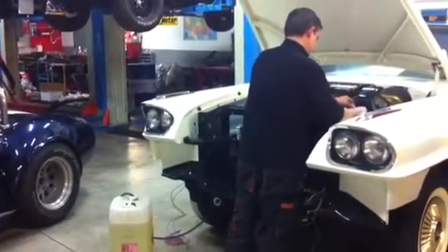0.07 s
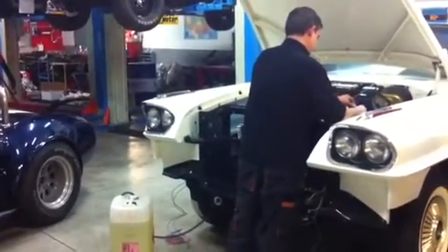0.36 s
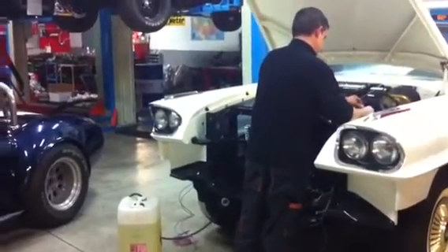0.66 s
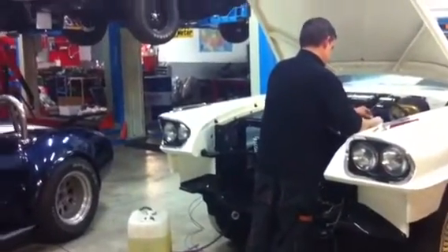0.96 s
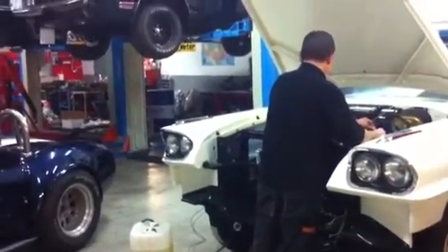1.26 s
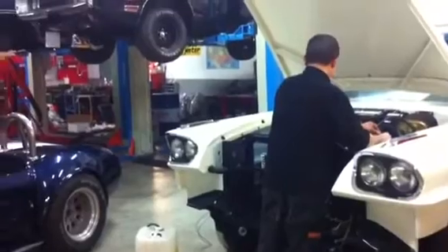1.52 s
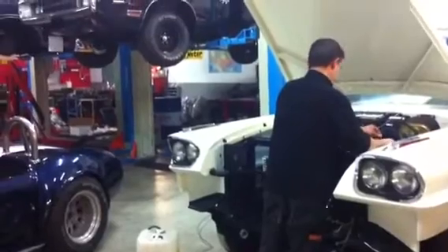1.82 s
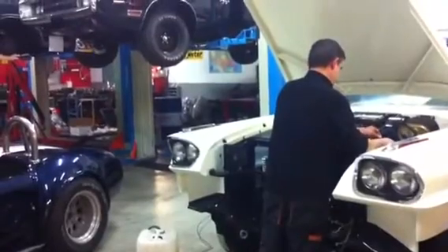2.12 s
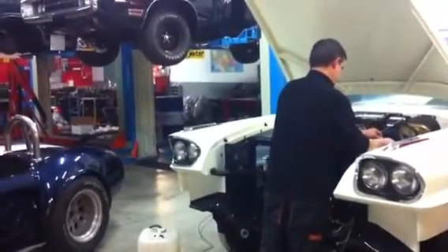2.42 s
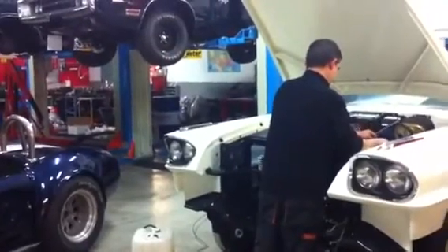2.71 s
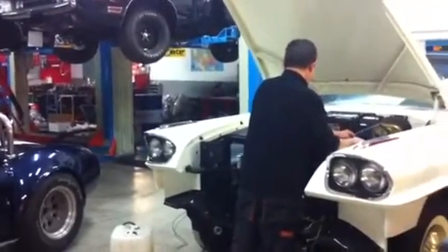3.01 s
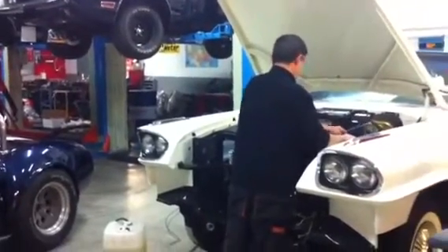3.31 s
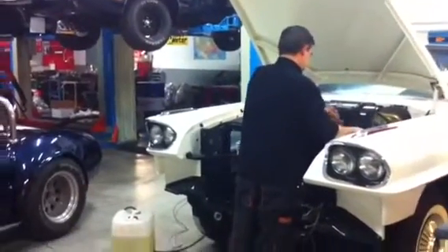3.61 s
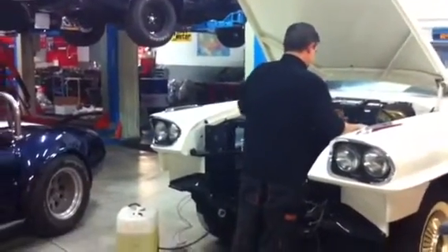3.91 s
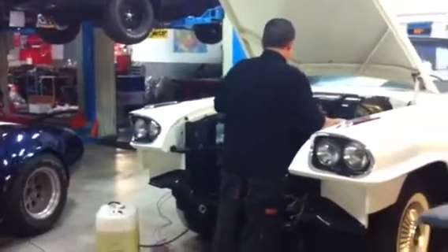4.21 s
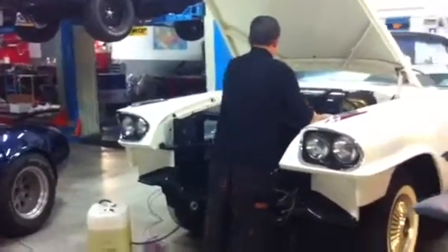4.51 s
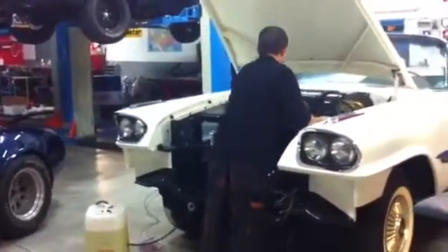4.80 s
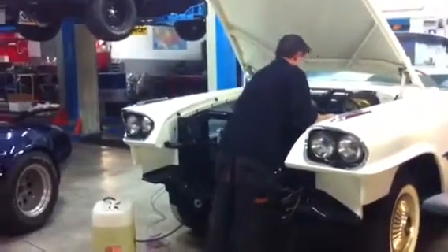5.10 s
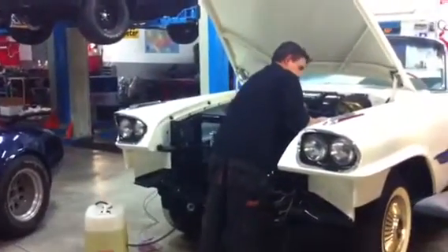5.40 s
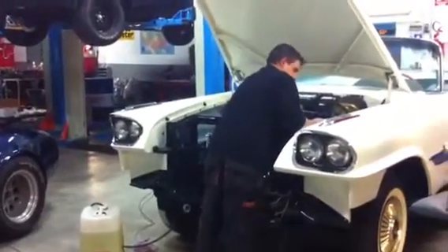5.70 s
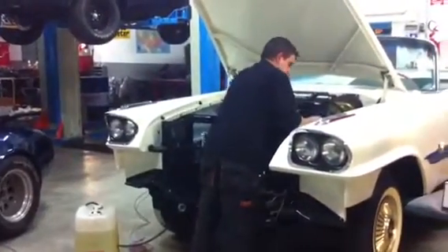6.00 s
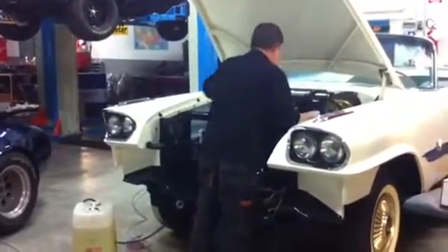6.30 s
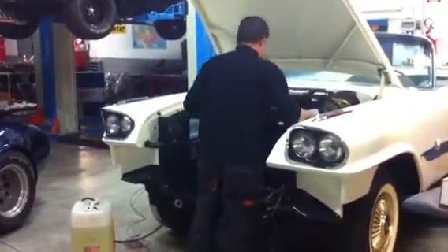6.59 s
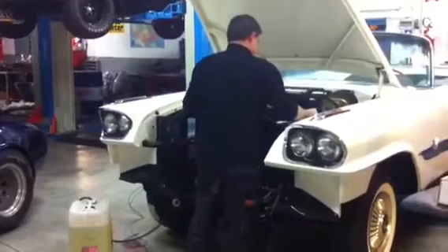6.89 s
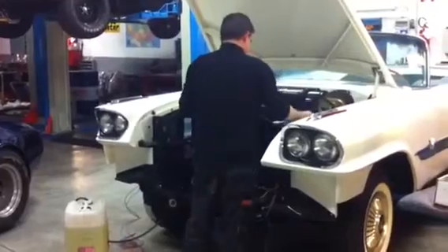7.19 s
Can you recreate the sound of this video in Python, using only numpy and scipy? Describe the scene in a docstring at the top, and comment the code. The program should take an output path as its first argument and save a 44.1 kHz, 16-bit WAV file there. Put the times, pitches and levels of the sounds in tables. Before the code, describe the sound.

An old V8 engine grinds on its starter, pauses with a few faint knocks, then cranks again and catches in a workshop.

```python
"""A hard-walled workshop with a faint hum. An old V8 is cranked: the starter pinion slams in, grinds
on the ring gear, swelling with each compression, and drops out. A few small knocks fill the pause.
The starter engages again; the engine catches, flares up with a rasp and starts to settle, each firing
puffing down the exhaust, gulping air and shaking the moving parts."""
import sys
import numpy as np
from scipy import signal
from scipy.fft import rfft, irfft
from scipy.io import wavfile
from scipy.ndimage import uniform_filter1d, minimum_filter1d

SR = 44100
rng = np.random.default_rng(int(sys.argv[2]) if len(sys.argv) > 2 else 0)


def wav_record(signal):
    """Record a signal, one row per channel, as 16-bit PCM in the file named by sys.argv[1]."""
    frames = np.transpose(np.atleast_2d(signal))
    bounded = np.clip(frames, -1, 1)
    # unit amplitude maps onto the largest positive 16-bit level
    quanta = np.round(bounded * 32767).astype(np.int16)
    wavfile.write(sys.argv[1], SR, quanta)


N = 324135
TIME = np.arange(N) / SR

# Starter case resonances. Each row: frequency in Hz, width in Hz, gain in dB.
CASE_MODES = [(225, 26, 1.5), (322, 20, -8.5), (389, 25, -4), (553, 20, 4), (638, 27, 3.5), (782, 60, -2.5),
              (914.7, 180, -0.5), (1199.4, 26, 6.5)]


def from_db(db):
    """Decibels to gain."""
    return np.exp(np.asarray(db) * np.log(10) / 20)


def unit_rms(x):
    """Scale to unit power."""
    return x / np.sqrt(np.mean(x ** 2) + 1e-20)


def noise():
    """White noise, unit power."""
    return rng.standard_normal(N)


def in_time(rows):
    """Interpolate (s, value) rows at every sample."""
    return np.interp(TIME, *np.transpose(rows))


def at_hz(rows, hz):
    """Interpolate (Hz, value) rows on a log-frequency axis."""
    row_hz, value = np.transpose(rows)
    return np.interp(np.log(hz), np.log(row_hz), value)


def drift(rate_hz, block=32):
    """Slow random wander, unit power."""
    count = N // block + 2
    low_pass = signal.butter(2, rate_hz, fs=SR / block, output="sos")
    slow = signal.sosfilt(low_pass, rng.standard_normal(2 * count))
    return np.interp(np.arange(N) / block, np.arange(count), unit_rms(slow[count:]))


def coloured(x, spectrum, size=4096):
    """Causal unit-power filter from (Hz, dB) rows; falls 24 dB per octave beyond them."""
    hz = np.maximum(np.arange(size // 2 + 1) * SR / size, 1)
    octaves_out = np.abs(np.log2(hz / np.clip(hz, spectrum[0][0], spectrum[-1][0])))
    cepstrum = irfft(np.log(from_db(at_hz(spectrum, hz) - 24 * octaves_out)))
    response = irfft(np.exp(rfft(2 * cepstrum[:size // 2], size)))
    return signal.oaconvolve(x, response / np.linalg.norm(response))[:len(x)]


def resonate(x, modes):
    """Parallel resonances, alternating in sign."""
    out = 0
    for k, (hz, width_hz, db) in enumerate(modes):
        r = np.exp(-np.pi * width_hz / SR)
        poles = [1, -2 * r * np.cos(2 * np.pi * hz / SR), r * r]
        gain = (-1) ** k * from_db(db) * (1 - r * r) / 2
        out = out + gain * signal.lfilter([1, 0, -1], poles, x + 1e-18)
    return out


def cycle_clicks(cycles):
    """A unit click at the start of each cycle."""
    return np.diff(np.floor(cycles), prepend=0)


def rattle(per_s, spread_db):
    """Random contacts, unit power."""
    contacts = (rng.random(N) < per_s / SR) * rng.choice([-1, 1], N)
    return unit_rms(contacts * from_db(spread_db * np.clip(noise(), -2, 2)))


def burst(t60_s, rise_s=0.0006, size=16384):
    """Noise with a quick rise and an exponential fall."""
    age_s = TIME[:size]
    return np.minimum(age_s / rise_s, 1) * from_db(-60 * age_s / t60_s) * rng.standard_normal(size)


def add(track, start_s, sound):
    """Mix a sound into a track."""
    start = round(start_s * SR)
    track[start:start + len(sound)] += sound[:N - start]


def gate(start_s, end_s, fade_s=0.014):
    """Open from start to end, with fades outside."""
    return np.interp(TIME, [start_s - fade_s, start_s, end_s, end_s + fade_s], [0, 1, 1, 0])


def room_tone():
    """Dull rush and faint hum of the workshop's machines."""
    # Each row: frequency in Hz, level in dB.
    hum_tones = [(199.2, -82), (888.2, -81.5), (1712, -80.5)]
    rush_spectrum = [(18, -75), (30, -47.5), (69, -37), (87, -19.5), (200, 0), (361, -11.5), (399, -11.5),
                     (523, -15), (877, -17.5), (1580, -23), (1710, -21), (2790, -25), (3010, -27.5),
                     (9340, -30), (10800, -36), (14100, -69.5), (22000, -120)]
    # Each row: time in seconds, level in dB.
    rush_level = [(2.6, -57.8), (3.7, -59.3), (4.6, -57.7), (5.7, -58.5)]
    hum = 0
    for hz, db in hum_tones:
        cycles = np.cumsum(hz + 1.1 * drift(5.9)) / SR
        hum += from_db(db) * np.sqrt(2) * np.sin(2 * np.pi * cycles)
    return from_db(in_time(rush_level)) * coloured(noise(), rush_spectrum) + hum


def knocks():
    """Hands and tools touch the engine bay; small metal parts ring briefly."""
    # Each row: start in seconds, level in dB, pitch in Hz, T60 in seconds, ring gain.
    touches = [(0.12, -60.5, 4470, 0.18, 1), (2.641, -57, 2200, .15, 1), (3.1, -68.5, 4500, .2, 0.86),
               (4.088, -68.5, 4500, .1, 1.1), (4.123, -61, 4940, .12, 1), (4.839, -56, 3800, 0.3, 1.5),
               (5.01, -62.5, 2660, 0.19, 3), (5.099, -64.5, 4400, .12, 0.92),
               (5.351, -51.5, 3220, 0.21, 4.2), (5.41, -64, 2630, 0.17, 4.5), (5.927, -49, 7000, 0.04, 1),
               (5.939, -52, 950, 0.13, 4), (6.077, -59, 2780, 0.7, 1.3), (6.14, -64, 4000, 0.19, 1),
               (6.278, -51.5, 2520, 0.092, 1)]
    # Each row: frequency in Hz, width in Hz, gain in dB.
    metal_modes = [(2420, 35, 3), (2700, 50, -3), (3050, 45, -1), (3881, 51, -19), (5265, 50, -5),
                   (6848, 40, -4.5), (8750, 50, 6.5)]
    out = np.zeros(N)
    for start_s, db, hz, t60_s, ring in touches:
        band = [(hz / 2, -8), (hz, 0), (hz * 2, -8)]
        touch = from_db(db) * coloured(burst(t60_s, rise_s=0.00268), band)
        add(out, start_s, touch + ring * resonate(touch, metal_modes))
    return out


def pinion_clunks(ring_gain=0.77, case_gain=6.0):
    """The pinion slams in, is kicked by the flywheel, drops out: steel clashes, a thud shakes the case."""
    # Each row: start in seconds, level in dB, T60 in seconds, thud in dB re the clash, ring in Hz.
    impacts = [(0.369, -12.5, 0.13, -9, 7560), (0.372, -19, .14, -9, 1220), (0.391, -32, 0.2443, 7, 1280),
               (1.992, -26.5, 0.11, 1.5, 2300), (2.16, -31, 0.17, -2, 1950),
               (2.168, -35.5, 0.27, -6.5, 1600), (6.296, -33, .1, 0, 2500), (6.3, -16.5, 0.14, -15.5, 2170),
               (6.318, -19.5, .1, -3.5, 3180), (6.337, -22, 0.31, -6, 2400), (6.364, -12.5, 0.19, -5, 2700),
               (6.387, -9, 0.093, -22, 3100), (6.874, -19, 0.092, -26, 1990),
               (6.913, -12.5, 0.08, -12, 4300), (6.934, -17, 0.05, 0, 1930), (6.965, -9, 0.13, -8.5, 3000)]
    # Each row: frequency in Hz, level in dB.
    clash_spectrum = [(410, -30), (700, -17), (1160, -8.5), (1470, -9), (1940, -5), (2330, -9.5),
                      (2590, -3), (2970, -11), (3210, -4), (3520, -7), (7090, -10), (10800, -18.5),
                      (14100, -57.5), (22000, -120)]
    thud_spectrum = [(59, -56.5), (100, -28.5), (210, -3.5), (389, -1.5), (459, -13), (560, 0.5),
                     (1020, -7.5), (1140, -1), (1400, -5.5), (1820, -44.5), (3080, -120)]
    out = np.zeros(N)
    for start_s, db, t60_s, thud_db, hz in impacts:
        clash = coloured(burst(t60_s), clash_spectrum)
        ring = coloured(burst(t60_s), [(hz / 1.25, -16), (hz, 0), (hz * 1.25, -16)])
        shove = from_db(thud_db) * burst(1.2 * t60_s, rise_s=0.0069)
        thud = 1.1 * coloured(shove, thud_spectrum) + case_gain * resonate(shove, CASE_MODES)
        add(out, start_s, from_db(db) * (clash + ring_gain * ring + thud))
    return out


def current_surges(width_s=0.004):
    """A faint low bump as the starter current switches on or off."""
    # Each row: time in seconds, peak in dB.
    bumps = [(0.372, -40), (2.018, -45), (6.304, -53), (6.772, -46)]
    return sum(from_db(db) * np.exp(-((TIME - s) / width_s) ** 2) for s, db in bumps)


def starter_load_db(lead_s=0, squareness=1.75):
    """Load re free cranking, lead_s ahead: each compression adds a swell."""
    # Each row: peak time in seconds, length in seconds, load in dB.
    compressions = [(0.52, 0.112, 14.4), (0.716, 0.114, 12.4), (0.903, 0.105, 13.8), (1.026, 0.028, 7.8),
                    (1.107, 0.1, 13.6), (1.216, 0.055, 16.6), (1.33, 0.04, 16.2), (1.456, 0.13, 13.2),
                    (1.593, 0.106, 15.4), (1.741, 0.045, 6.8), (1.915, 0.105, 13), (6.533, 0.075, 10.3),
                    (6.603, 0.045, 9.5), (6.79, 0.08, 7)]
    labouring = (1.28, 0.3, 10.8)   # midway through the first try
    load = 1
    for peak_s, length_s, db in [*compressions, labouring]:
        distance = np.abs(2 * (TIME + lead_s - peak_s) / length_s)
        load += (from_db(db) - 1) * np.exp(-distance ** squareness)
    return 20 * np.log10(load)


def starter(jitter=0.025, bounce=0.81, slide=1.1, shudder_db=1.5):
    """Pinion teeth strike, bounce and slide on the ring gear; gear, teeth and motor case ring."""
    # Each row: start in seconds, end in seconds, gear level in dB, motor level in dB.
    tries = [(0.43, 2.0, 0, 0), (6.43, 6.87, -3.5, -1.8)]
    # One curve per try. Each row: time in seconds, teeth meshing per second.
    mesh_rate = [
        [(0.4, 169), (0.6, 140), (0.85, 138), (0.97, 113), (1.4, 126), (1.58, 128), (1.85, 177), (2.0, 190)],
        [(6.4, 190), (6.7, 140), (6.85, 121)],
    ]
    # One curve per try. Each row: time in seconds, level in dB.
    note_level = [
        [(0.42, -49), (0.73, -53), (0.8, -42.5), (1.08, -51), (1.3, -48), (1.57, -55), (1.67, -41), (1.9, -53),
         (2.0, -44)],
        [(6.43, -57), (6.65, -57), (6.73, -47)],
    ]
    # Each row: frequency in Hz, width in Hz, gain in dB.
    ring_gear_modes = [(1568, 50, -14), (1665, 24, -6), (1775, 26, -10), (1862, 22, -8), (1950, 30, 3),
                       (2114, 24, -5), (2190, 32, -4), (2329, 22, -3), (2440, 36, -15), (2598, 20, -8),
                       (2738, 22, -14.5), (2930, 59, -14.5)]
    tooth_modes = [(3060, 68, -1.5), (3252, 48, 3), (3600, 36, -0.5), (4150, 110, -1.5), (4730, 24, 0.5),
                   (5700, 40, -6.5), (6546, 50, -2), (7260, 55, -5), (7910, 76, -8.5), (8650, 80, -15),
                   (9580, 210, -16.5)]
    # Each row: frequency in Hz, level in dB.
    grind_spectrum = [(1250, -13), (1500, -11.5), (1800, -4), (2020, 0), (2250, -3.5), (2500, -6),
                      (3000, -11)]
    scrape_spectrum = [(2500, -2.5), (3200, -4), (4200, -5), (5300, -9.5), (6050, -16), (6600, -16),
                       (8000, -16.5), (10800, -25)]
    growl_spectrum = [(170, -14), (230, -8), (320, -11), (460, -12), (600, -0.5), (1000, -1.5), (1300, 2),
                      (1600, -6.5)]

    teeth = np.cumsum(in_time(np.vstack(mesh_rate)) * (1 + jitter * drift(25))) / SR
    strikes = unit_rms(cycle_clicks(teeth) * from_db(2 * noise()))
    sliding = unit_rms(noise() * np.exp(-2 * (teeth % 1)))
    contact = strikes + bounce * rattle(1500, spread_db=0) + slide * sliding
    force = unit_rms(contact * from_db(shudder_db * drift(60)))   # backlash shudder

    gear_ring = unit_rms(resonate(force, ring_gear_modes))
    grind = 0.54 * coloured(unit_rms(sliding + 0.6 * rattle(900, spread_db=1.5)), grind_spectrum)
    tooth_ring = unit_rms(resonate(force + 0.88 * noise(), tooth_modes))
    scrape = 0.83 * coloured(0.5 * force + noise(), scrape_spectrum)
    case_ring = unit_rms(resonate(strikes + 3.0 * noise(), CASE_MODES))
    growl = 1.3 * coloured(force, growl_spectrum)
    # the mesh note sags as the motor labours
    note = np.sqrt(2) * np.sin(2 * np.pi * teeth) * from_db(2.5 * drift(7.6))
    note *= from_db(in_time(np.vstack(note_level)))

    # each part follows the load; the teeth scrape just before the ring gear swells
    load_db = starter_load_db()
    grinding = from_db(-26.7 + 0.99 * load_db) * unit_rms(gear_ring + grind)
    scraping = from_db(-32 + 0.68 * starter_load_db(lead_s=0.012)) * unit_rms(tooth_ring + scrape)
    motor = from_db(-32.6 + 0.2 * load_db) * unit_rms(case_ring + growl)
    meshed = sum(from_db(db) * gate(start_s, end_s) for start_s, end_s, db, _ in tries)
    powered = sum(from_db(db) * gate(start_s, end_s) for start_s, end_s, _, db in tries)
    return meshed * (grinding + scraping) + powered * (motor + note)


def flare(start_s, start_db, peak_s, peak_db, idle_db, settle_s, rise_s=0.025):
    """Gain as the engine catches: fades in, climbs evenly in dB, relaxes towards idle."""
    climb_db = np.interp(TIME, [start_s, peak_s], [start_db, peak_db])
    relax_db = (idle_db - peak_db) * (1 - np.exp(-np.maximum(TIME - peak_s, 0) / settle_s))
    return np.clip((TIME - start_s) / rise_s, 0, 1) * from_db(climb_db + relax_db)


def engine(jitter=0.008, gas_gain=2.04, stroke_decay=0.25):
    """Each firing puffs down the exhaust, gulps air and shakes moving parts. Returns bay, tailpipe."""
    # Each row: time in seconds, firings per second, evenness from 0 to 1.
    run_up = [(6.75, 113, .2), (6.83, 123, 0.72), (6.91, 154, 0), (7.0, 178, 0.2), (7.1, 167, 0.45),
              (7.17, 162, 1), (7.24, 149, .93), (7.35, 143, .9)]
    # Strength of each cylinder, in firing order.
    cylinder_db = [2.5, 1.5, 1, -1.5, 1.5, 1, 0, 1.5]
    # Each row: frequency in Hz, level in dB.
    exhaust_spectrum = [(170, -6.5), (225, -3), (260, -0.5), (297, -1), (350, -6.5), (420, -13), (480, -23),
                        (600, -20.5)]
    intake_spectrum = [(260, -52.5), (450, -3), (562, -7.5), (639, 1.5), (931, -3), (1050, 0.5),
                       (1420, -23), (1600, -2.5), (2080, -11), (3520, -120)]
    rasp_spectrum = [(760, -37), (1300, -5.5), (1460, -13), (1640, -3.5), (1820, -7.5), (1950, 1),
                     (2400, -6), (2840, -1.5), (3070, -5), (4050, -5.5), (6030, -11.5), (6590, -6),
                     (8080, -8.5), (9910, -12), (10800, -18.5), (14100, -42), (22000, -120)]
    tailpipe_spectrum = [(40, -40), (70, -12.5), (110, -3), (160, 7.5), (190, -5)]

    times_s, firing_hz, evenness = np.transpose(run_up)
    firings = np.cumsum(np.interp(TIME, times_s, firing_hz) * (1 + jitter * drift(24))) / SR
    even = np.interp(TIME, times_s, evenness)
    strength = from_db(np.array(cylinder_db)[firings.astype(int) % len(cylinder_db)])
    burble_db = 8.6 * (1 - even) * np.clip(noise(), -2, 2)   # ragged combustion
    pulses = unit_rms(cycle_clicks(firings) * strength * from_db(burble_db))
    stroke = unit_rms(strength * np.exp(-stroke_decay * (firings % 1)))

    puffs = unit_rms(coloured(pulses + gas_gain * stroke * noise(), exhaust_spectrum))
    gulps = coloured(stroke * noise(), intake_spectrum)
    clatter = unit_rms(noise() + 0.5 * rattle(1500, spread_db=-2))
    rasp = coloured(stroke * clatter * from_db(1.8 * drift(34)), rasp_spectrum)
    # the pipe booms at the firing rate once the engine runs evenly
    tone = unit_rms(strength * np.sin(2 * np.pi * firings))
    boom = even * tone + np.sqrt(1 - even ** 2) * coloured(stroke * noise(), tailpipe_spectrum)

    puffs *= flare(start_s=6.865, start_db=-24, peak_s=7.04, peak_db=-15.5, idle_db=-24, settle_s=0.1)
    gulps *= flare(start_s=6.74, start_db=-35.5, peak_s=7.01, peak_db=-17.8, idle_db=-35, settle_s=0.06)
    rasp *= flare(start_s=6.742, start_db=-19.5, peak_s=6.96, peak_db=-11.3, idle_db=-30, settle_s=0.16)
    boom *= flare(start_s=6.795, start_db=-30, peak_s=7.2, peak_db=-18.5, idle_db=-22, settle_s=0.12)
    return puffs + gulps + rasp, boom


def workshop(x, first_echo_s=0.0043):
    """Dense wall reflections, dying sooner in the treble; unit-power response."""
    # Each row: frequency in Hz, T60 in seconds.
    decay = [(150, 0.98), (700, .75), (2000, 0.6), (5000, 0.57), (10000, .48)]
    edges_hz = np.geomspace(60, 14000, 9)
    age_s = TIME[:SR]
    response = np.zeros(SR)
    for low, high in zip(edges_hz, edges_hz[1:]):
        band_pass = signal.butter(2, [low, high], "band", fs=SR, output="sos")
        band = signal.sosfilt(band_pass, rng.standard_normal(SR))
        response += band * from_db(-60 * age_s / at_hz(decay, np.sqrt(low * high)))
    response *= age_s > first_echo_s
    return signal.oaconvolve(x, response / np.linalg.norm(response))[:N]


def scene(crossfade_hz=1.1, reverb_db=-9):
    """The car rings in the workshop; tailpipe boom, surges and room tone stay dry."""
    bay, tailpipe = engine()
    car = starter() + pinion_clunks() + bay + knocks()
    # two room reverbs slowly crossfade, so the ringing stays even in colour
    crossfade = 2 * np.pi * crossfade_hz * TIME
    reflections = np.cos(crossfade) * workshop(car) + np.sin(crossfade) * workshop(car)
    return (car + from_db(reverb_db) * reflections + tailpipe + current_surges() + room_tone())[None]


def record(dry, ceiling=0.92, hold_samples=257, cutoff_hz=10750):
    """Fast peak limiter, then a low-pass."""
    allowed = ceiling / np.maximum(np.abs(dry), ceiling)
    gain = uniform_filter1d(minimum_filter1d(allowed, hold_samples), hold_samples)
    low_pass = signal.firwin(257, cutoff_hz, window="blackman", fs=SR)
    return signal.oaconvolve(gain * dry, low_pass[None], "same")


dry = scene()
out = record(dry)
wav_record(out)
```